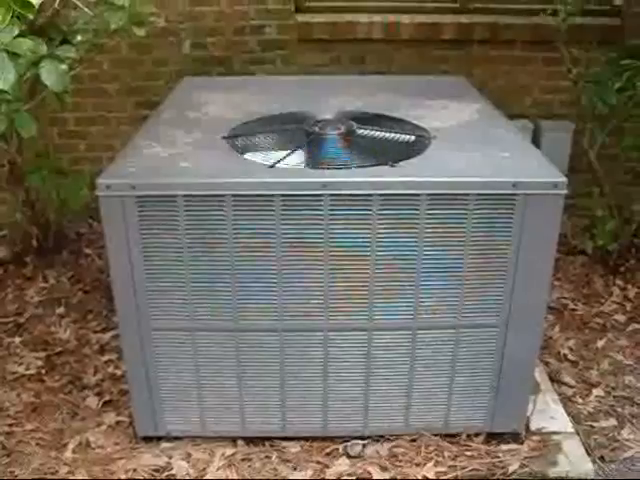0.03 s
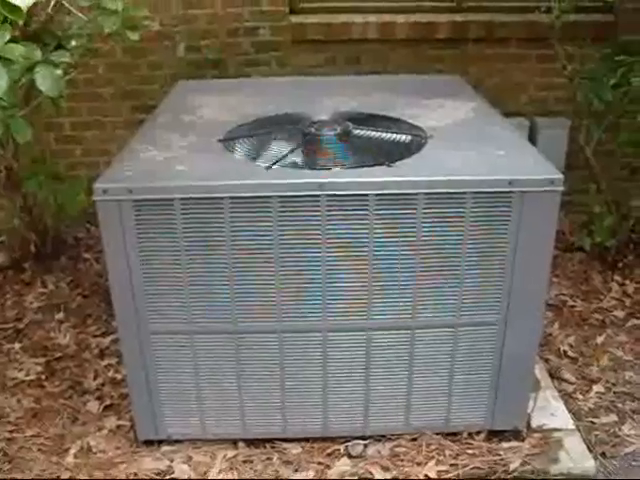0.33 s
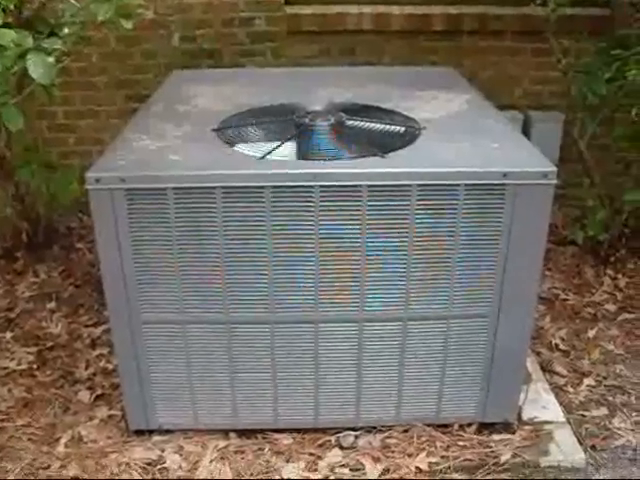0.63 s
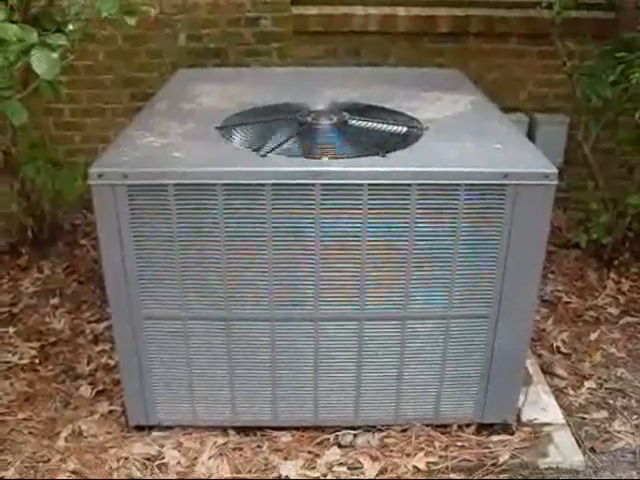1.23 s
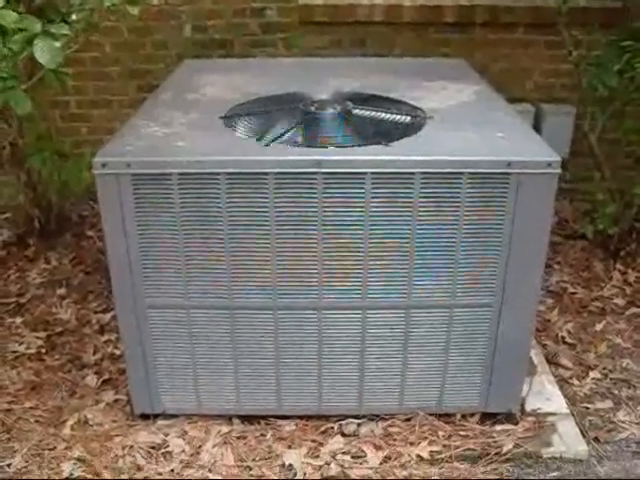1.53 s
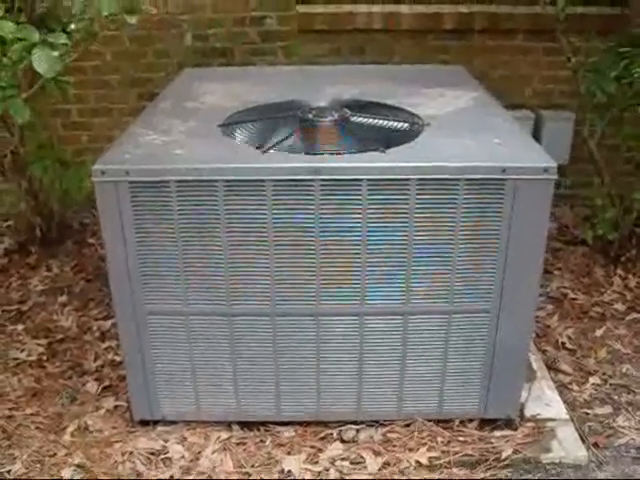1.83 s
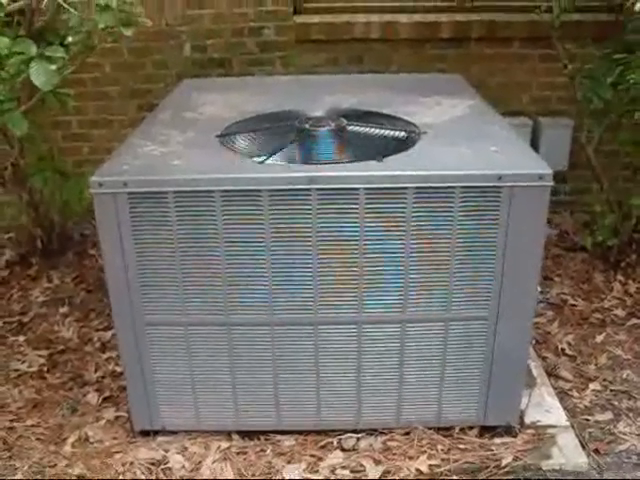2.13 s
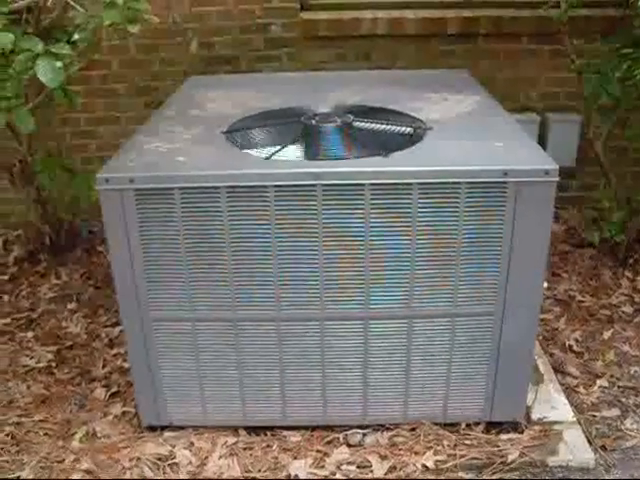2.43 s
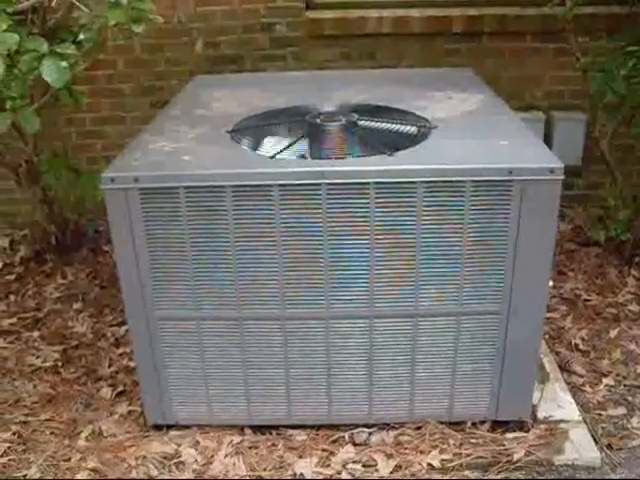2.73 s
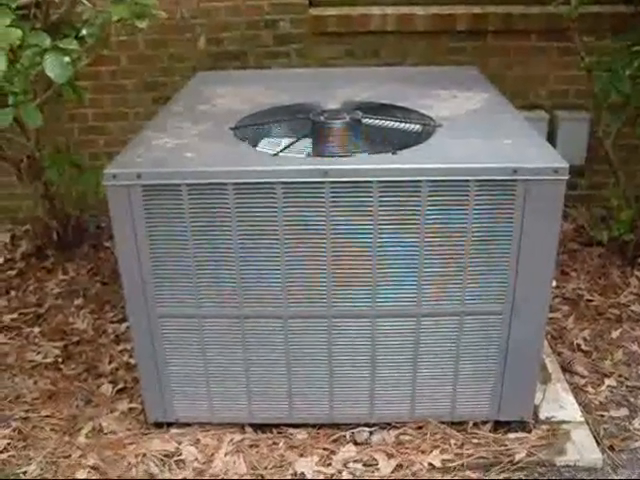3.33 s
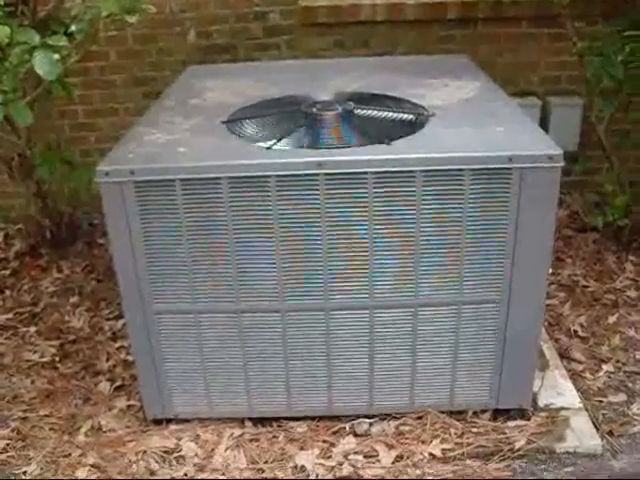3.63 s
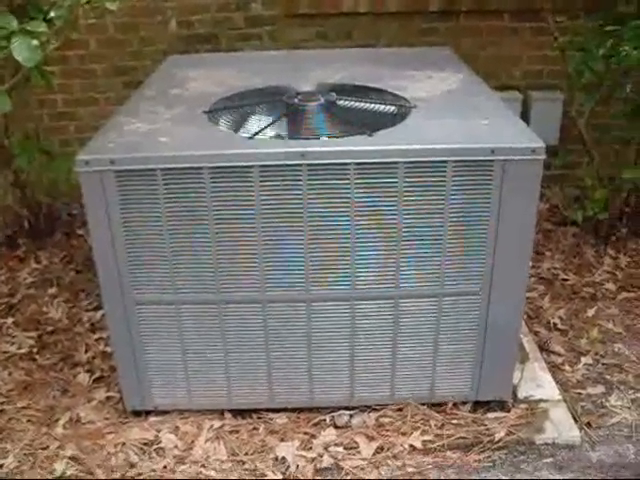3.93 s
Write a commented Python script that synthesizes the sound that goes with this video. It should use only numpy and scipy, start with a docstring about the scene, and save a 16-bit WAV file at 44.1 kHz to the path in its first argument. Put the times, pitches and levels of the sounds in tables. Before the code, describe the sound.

An outdoor heat pump hums and rattles, then settles into a steady fan whir.

```python
"""An outdoor heat pump runs close by: its compressor hums and whines under the rush of its fan.
At first it labours: each stroke makes the casing drone and a loose panel rattle, until it settles
after about a second. A valve taps once per turn, and gas hisses through the pipes with every stroke.
Near the end something small and hard clicks and bounces once, and a soft rustle follows."""
import sys
import numpy as np
from scipy import signal
from scipy.fft import rfft, irfft
from scipy.io import wavfile

SR = 44100
rng = np.random.default_rng(int(sys.argv[2]) if len(sys.argv) > 2 else 0)


def inscribe(sig):
    """Save sig as 16-bit PCM at rate SR to the path in sys.argv[1].

    A 1-D sig is mono; a 2-D sig holds one channel per row.
    Samples are clipped to [-1, 1] before scaling.
    """
    pcm = np.round(np.clip(np.atleast_2d(sig).T, -1, 1) * 32767)
    wavfile.write(sys.argv[1], SR, pcm.astype(np.int16))


N = 176400

# Compressor speed. Each row: time in seconds, turns per second.
SPEED = [(0, 59.6), (1.2, 59.6), (1.35, 59.52), (4, 59.52)]
STROKE_AT_TURNS = .57


def amp(db):
    """Decibels to gain."""
    return 10 ** (np.asarray(db) / 20)


def unit(x):
    """Scale to rms 1."""
    return x / np.sqrt(np.mean(x ** 2) + 1e-20)


def curve(points):
    """Per-sample control curve from (seconds, value) rows."""
    return np.interp(np.arange(N) / SR, *np.transpose(points))


def colour(points, hz):
    """Gain at hz of a spectrum given as (Hz, dB) rows."""
    points_hz, db = np.transpose(points)
    return amp(np.interp(np.log(hz + 1), np.log(points_hz + 1), db))


def tint(x, points):
    """Filter x by a spectrum; rms 1."""
    hz = np.fft.rfftfreq(len(x), 1 / SR)
    return unit(irfft(rfft(x) * colour(points, hz), len(x)))


def drift(rate_hz):
    """Slow random fluctuation; rms 1."""
    hz = np.fft.rfftfreq(N, 1 / SR)
    return unit(irfft(rfft(rng.standard_normal(N)) * np.exp(-(hz / rate_hz) ** 2), N))


def resonate(x, centre_hz, width_hz):
    """Pass x through a steep resonance; rms 1."""
    hz = np.fft.rfftfreq(N, 1 / SR)
    return unit(irfft(rfft(x) / (1 + 1j * (hz - centre_hz) / width_hz) ** 2, N))


def strokes(turns, response, overtones, ring_turns, sweep_s_per_hz=0):
    """One blow per turn: the decaying response sets the overtones' phases, the table their levels."""
    size = len(response)
    place, order = np.arange(size) / size, np.arange(size // 2 + 1)
    hz = order * SPEED[0][1]
    phase = np.angle(rfft(response * np.exp(-place / ring_turns)))
    phase -= np.pi * sweep_s_per_hz * hz ** 2  # higher overtones arrive later
    in_band = (order > 1) & (hz < overtones[-1][0])
    spectrum = colour(overtones, hz) * np.exp(1j * phase) * in_band
    return np.interp(turns % 1, place, irfft(spectrum) * size / np.sqrt(2))


def hum(turns):
    """The compressor hums at its turning rate; the octave swells and fades."""
    # Octave level. Each row: time in seconds, level in dB.
    octave_db = [(0, -33.5), (.3, -38.5), (.62, -43), (.85, -53), (2.1, -56), (2.25, -46.5), (2.6, -59.5),
                 (3.5, -58), (3.85, -40.5), (4, -55)]
    fundamental = amp(-39.5 - .2 * drift(27)) * np.cos(2 * np.pi * (turns - .27))
    octave = amp(curve(octave_db)) * np.sin(2 * np.pi * 2 * turns)
    return np.sqrt(2) * (fundamental + octave)


def whine(turns, at_turns=.2009, smear_rad=1.05, waver_hz=13):
    """Three neighbouring overtones, smeared over the turn by their lags, waver most under load."""
    # Whine overtones. Each row: nominal frequency in Hz, base level in dB.
    overtones = [(1131, -50), (1191, -48), (1250, -55)]
    # Whine envelope. Each row: time in seconds, gain in dB.
    gain_db = [(.22, -4), (.5, 4), (.68, 2.5), (.75, 9.5), (.81, -3), (.88, 4.5), (1.02, 2), (1.2, 0.5)]
    # Waver in strength and phase. Each row: time in seconds, depth as a fraction.
    waver_depth = [(0, .55), (1.4, .1)]
    out = 0
    for hz, db in overtones:
        order = round(hz / SPEED[0][1])
        phase = 2 * np.pi * order * (turns - at_turns) + smear_rad * (order - 20) ** 2
        waver = (drift(waver_hz) + 1j * drift(waver_hz)) / np.sqrt(2)
        out += amp(db) * np.real((1 + curve(waver_depth) * waver) * np.exp(1j * phase))
    return np.sqrt(2) * out * amp(curve(gain_db))


def casing(turns, drone_at_turns=.82):
    """Each stroke shakes the casing; drone and boom die as the load eases, a steady tone stays."""
    # Spectra of the steady tone, the drone and the boom (the one overtone that the casing's main
    # resonance singles out). Each row: frequency in Hz, base level per overtone in dB.
    steady_overtones = [(120, -91), (179, -52.5), (238, -81), (300, -65.5), (536, -67), (596, -59.5),
                        (655, -56.5), (715, -60), (800, -65), (893, -56.5), (1012, -60), (1100, -64),
                        (1300, -68.5), (1600, -67.5), (1667, -57.5), (1730, -72), (2100, -59.5),
                        (2300, -67), (3400, -72), (5000, -77), (12000, -82)]
    drone_overtones = [(120, -79), (179, -37.5), (238, -55.5), (298, -64), (357, -58.5), (417, -59),
                       (476, -71), (536, -61.5), (596, -48.5), (655, -40.5), (715, -67), (775, -43.5),
                       (834, -47.5), (953, -48.5), (1012, -86), (1072, -51), (1300, -60)]
    boom_overtones = [(655, -60), (715, 0), (775, -60)]
    # Drone and boom envelopes. Each row: time in seconds, gain in dB.
    drone_db = [(0, 0.5), (.4, 0.5), (.62, 0), (.8, -4), (1, -11), (1.22, -13.5), (1.29, -42)]
    boom_db = [(0, -40.5), (.3, -34), (.58, -35), (.72, -39.5), (.86, -38.5), (.95, -44.5), (1.24, -48.5),
               (1.32, -85)]
    response = rng.standard_normal(8192)
    jitter_turns = .00021 * drift(34)
    steady = strokes(turns - STROKE_AT_TURNS + jitter_turns, response, steady_overtones, ring_turns=.73)
    steady *= amp(.26 * drift(25))
    drone = strokes(turns - drone_at_turns, response, drone_overtones, ring_turns=.45)
    drone *= amp(curve(drone_db) + .5 * drift(25))
    boom = strokes(turns - drone_at_turns, response, boom_overtones, ring_turns=.45)
    boom *= amp(curve(boom_db) + .5 * drift(12))
    return steady + drone + boom


def valve(turns, knock_s=.968, knock_width_s=.008):
    """The valve taps once per turn, later once the load is off; one tap lands harder."""
    # Tap spectrum. Each row: frequency in Hz, base level per overtone in dB.
    overtones = [(900, -66), (1130, -63.5), (1280, -52.5), (1400, -54), (1500, -55), (1800, -55.5),
                 (2300, -78), (3500, -86)]
    # Tap envelope. Each row: time in seconds, gain in dB.
    gain_db = [(0, -16), (.65, -7), (.85, 2.5), (1.04, 0), (1.14, -5), (1.28, -7), (4, -13)]
    # Tap timing. Each row: time in seconds, place in the cycle in turns.
    at_turns = [(1.1, .57), (1.4, .66)]
    knock_db = 9.5 * np.exp(-((np.arange(N) / SR - knock_s) / knock_width_s) ** 2)
    impulse = signal.unit_impulse(8192)
    taps = strokes(turns - curve(at_turns), impulse, overtones, ring_turns=1, sweep_s_per_hz=6e-7)
    return taps * amp(curve(gain_db) + knock_db + .9 * drift(40))


def buzz(turns, overtones, ring_turns, attack_turns=.12, shift_hz=2.5, size=8192):
    """A loose panel buzzes once per turn; its contact points slowly shift, so each overtone wanders."""
    rise = np.minimum(np.arange(size) / size / attack_turns, 1)
    contacts = [rise * rng.standard_normal(size) for _ in range(3)]
    main, second, third = (strokes(turns, contact, overtones, ring_turns) for contact in contacts)
    mix2, mix3 = .3 * drift(shift_hz), .3 * drift(shift_hz)
    return (main + mix2 * second + mix3 * third) / np.sqrt(1 + mix2 ** 2 + mix3 ** 2)


def panel(turns, scrape_decay_turns=.65):
    """Under load the panel rattles and rings; it softens to a midrange rasp, then comes to rest."""
    # Rattle and rasp spectra. Each row: frequency in Hz, base level per overtone in dB.
    rattle_overtones = [(1000, -60), (1490, -51.5), (1610, -46.5), (1669, -41.5), (1730, -54), (1900, -52),
                        (2200, -53), (2385, -48), (2504, -48.5), (2650, -54), (2900, -49.5), (3100, -55),
                        (3220, -49.5), (3340, -65), (3460, -49), (3600, -62.5), (4400, -58.5),
                        (5300, -64.5), (7000, -67), (10000, -83)]
    rasp_overtones = [(1100, -64), (1310, -50), (1700, -59), (2250, -61), (2500, -68), (4200, -73)]
    # Their envelopes. Each row: time in seconds, gain in dB.
    rattle_db = [(0, 0), (.35, 0.5), (.72, -2), (.82, -7), (1.08, -10.5), (1.3, -23), (4, -56)]
    rasp_db = [(.6, -16), (.8, 3), (1.21, -1), (1.3, -29)]
    # Noise in the rattle. Each row: frequency in Hz, relative density in dB.
    fuzz_spectrum = [(200, -4.5), (1000, 3.5), (1400, 1), (2400, 2.5), (3400, 0.5), (5500, -5.5),
                     (7500, -12), (12000, -35)]
    stroke_turns = turns - STROKE_AT_TURNS
    scrape = rng.standard_normal(N) * np.exp(-(stroke_turns % 1) / scrape_decay_turns)
    ring = amp(-50) * resonate(scrape, centre_hz=3353, width_hz=22)
    fuzz = amp(-45) * tint(scrape, fuzz_spectrum)
    rattle = buzz(stroke_turns, rattle_overtones, ring_turns=.28) + fuzz + ring
    rasp = buzz(stroke_turns, rasp_overtones, ring_turns=1.2)
    return rattle * amp(curve(rattle_db)) + rasp * amp(curve(rasp_db))


def gas(turns, pulse_depth=.31, peak_at_turns=.96):
    """Uneven spurts of gas, one per stroke, hiss, ring the pipes and whistle in the valve."""
    # Hiss spectrum. Each row: frequency in Hz, relative density in dB.
    hiss_spectrum = [(20, -50), (1500, -22), (2200, -13), (3100, -10), (4100, -0.5), (5500, -23),
                     (7600, -6), (8800, 5.5), (10500, -4.5), (13000, 0)]
    # Pipe resonances and valve whistles. Each row: centre in Hz, width in Hz, base level in dB.
    pipes = [(2174, 82, -56), (2768, 86, -56.5), (3186, 85, -59), (3430, 51, -61.5), (4496, 61, -60),
             (5610, 26, -70)]
    whistles = [(3676, 36, -57), (6690, 37, -60.5), (8095, 120, -64), (8890, 97, -62.5)]
    # Whistle envelope. Each row: time in seconds, gain in dB.
    whistle_db = [(0, -2), (.55, 4), (1.2, 2.5), (1.33, 7), (1.48, 1), (1.85, 5.5), (1.97, 2), (3.4, -2),
                  (4, 1.5)]
    pulse = 1 + pulse_depth * np.cos(2 * np.pi * (turns - peak_at_turns))
    flow = pulse * amp(1.1 * drift(33))
    out = amp(-52) * tint(flow * rng.standard_normal(N), hiss_spectrum)
    spurts = flow ** 1.48 * amp(3.5 * np.tanh(drift(23)))
    for hz, width_hz, db in pipes:
        out += amp(db) * resonate(spurts * rng.standard_normal(N), hz, width_hz)
    for hz, width_hz, db in whistles:
        level_db = db + curve(whistle_db) + 4 * np.tanh(drift(35))
        out += amp(level_db) * unit(flow * resonate(rng.standard_normal(N), hz, width_hz))
    return out


def fan(level_db=-42, swell_db=1):
    """Air rushes through the blades and the grille."""
    # Air noise. Each row: frequency in Hz, relative density in dB.
    spectrum = [(10, -10), (30, 3), (42, -9.5), (57, 5), (72, -9), (92, 0), (140, -9.5), (250, -11.5),
                (500, -19), (900, -20), (1200, -18), (1500, -21.5), (2000, -20.5), (3000, -31),
                (4200, -29.5), (8000, -32.5), (13000, -35)]
    return tint(rng.standard_normal(N), spectrum) * amp(level_db + swell_db * drift(12))


def click(strike_s=3.9139, bounce_delay_s=.00233):
    """Something small and hard strikes and bounces once, ringing briefly each time."""
    # Ringing modes. Each row: frequency in Hz, relative level in dB, T60 in seconds.
    modes = [(880, -3.5, 0.013), (1490, -0.5, 0.0062), (1750, -1.5, 0.012), (2130, 1.5, 0.0074),
             (3020, -5, 0.0058), (3500, -7, 0.0053), (4830, -6.5, 0.0045), (5550, -9, .004),
             (7240, -15, 0.0093), (9700, -11, .003)]
    out = 0
    for start_s, hit_db in [(strike_s, -21.5), (strike_s + bounce_delay_s, -20.5)]:
        age_s = np.clip(np.arange(N) / SR - start_s, 0, 1)
        for k, (hz, db, t60_s) in enumerate(modes):
            decay = np.exp(-np.log(1000) * age_s / t60_s)
            out += (-1) ** k * amp(hit_db + db) * decay * np.sin(2 * np.pi * hz * age_s)
    return out


def rustle():
    """A soft swell of noise follows the click."""
    # Rustle spectrum. Each row: frequency in Hz, relative density in dB.
    spectrum = [(100, -11), (350, 8), (900, -2), (2000, -16), (3700, -7), (4500, -40), (12000, -40)]
    # Rustle envelope. Each row: time in seconds, level in dB.
    level_db = [(3.9, -90), (3.925, -45), (3.96, -39), (4, -46)]
    return tint(rng.standard_normal(N), spectrum) * amp(curve(level_db))


def scene():
    """Mono sum; the compressor's turn count times all its sounds."""
    turns = np.cumsum(curve(SPEED)) / SR
    compressor = hum(turns) + whine(turns) + casing(turns) + valve(turns)
    return (compressor + panel(turns) + gas(turns) + fan() + click() + rustle())[None]


def record(dry, cutoff_hz=12790):
    """Steep low-pass."""
    lowpass = signal.firwin(1023, cutoff_hz, window=("kaiser", 9), fs=SR)
    return signal.oaconvolve(dry, lowpass[None], "same")


dry = scene()
out = record(dry)
inscribe(out)
```